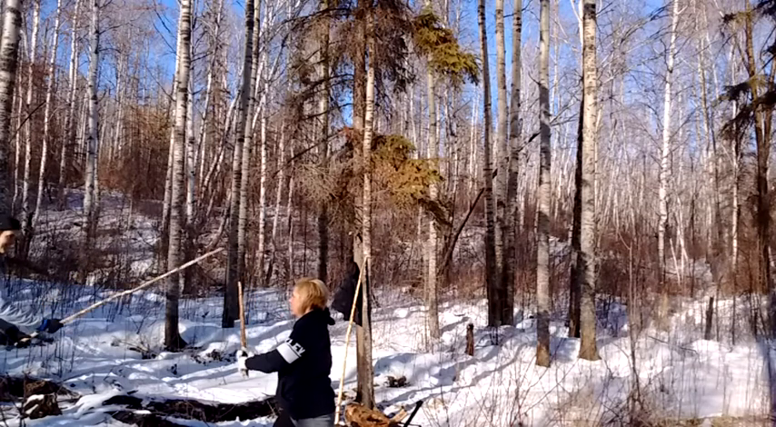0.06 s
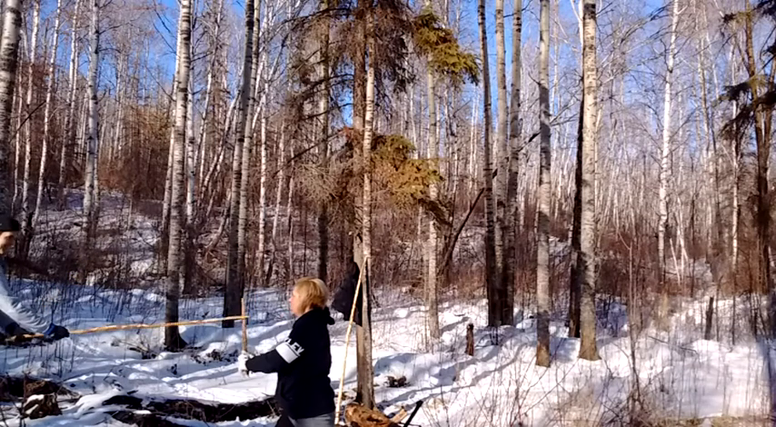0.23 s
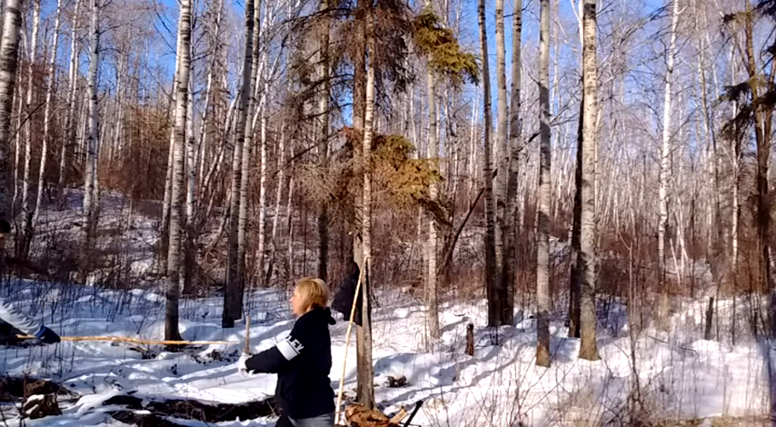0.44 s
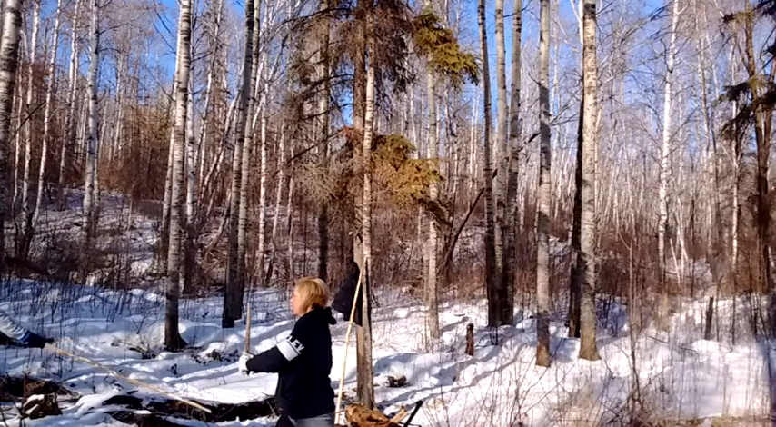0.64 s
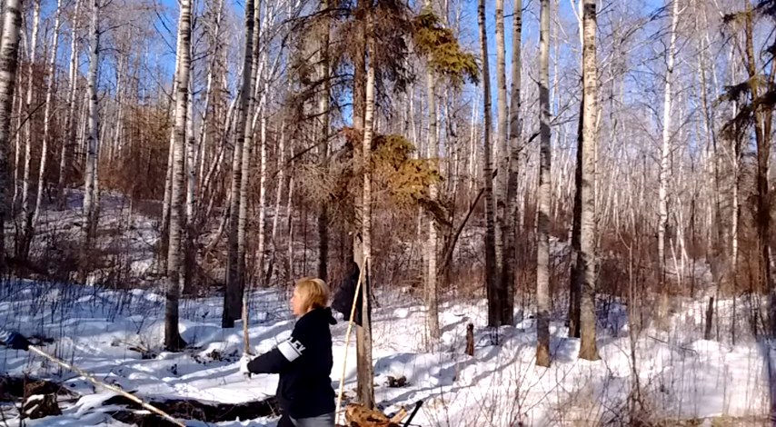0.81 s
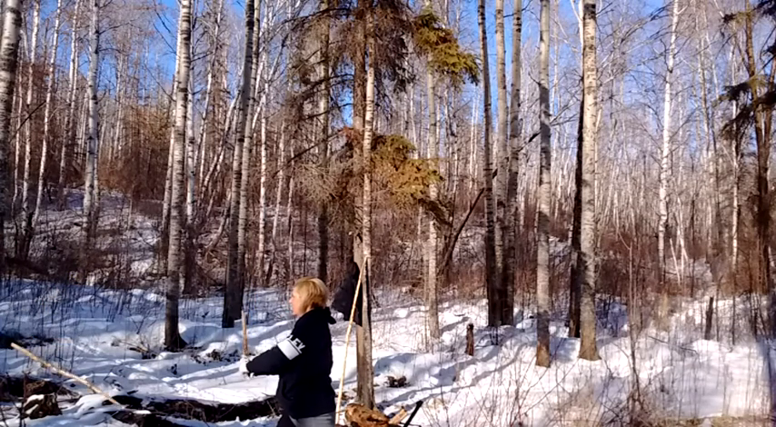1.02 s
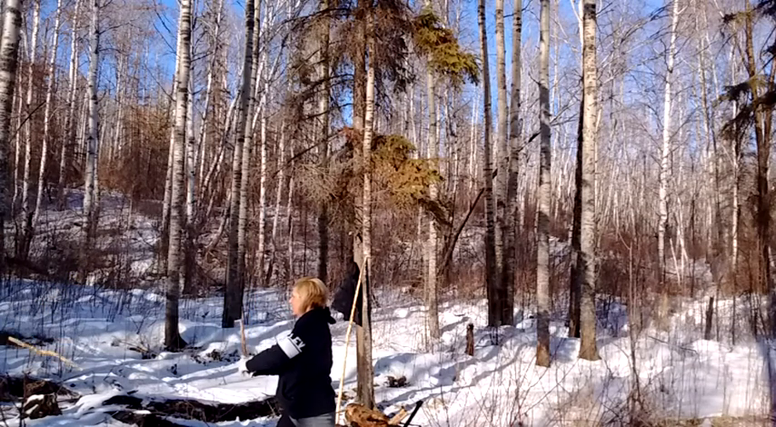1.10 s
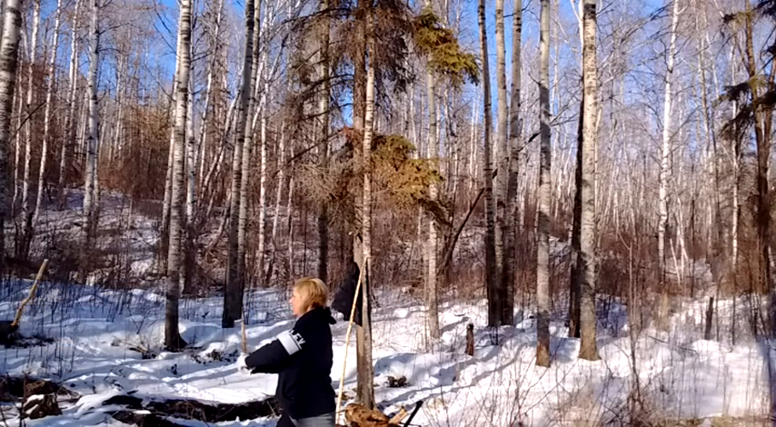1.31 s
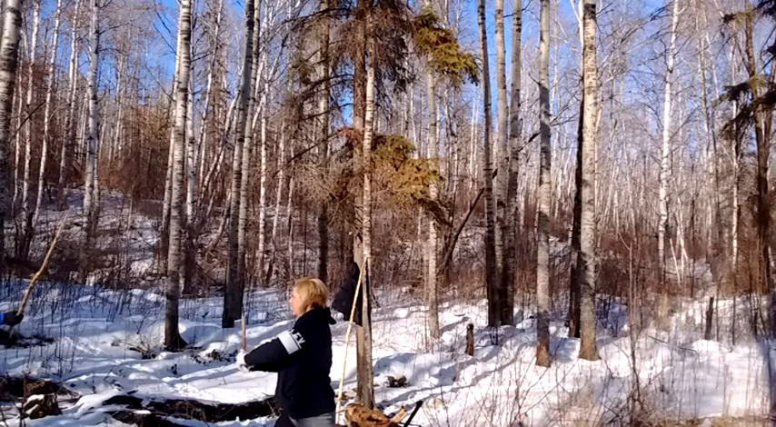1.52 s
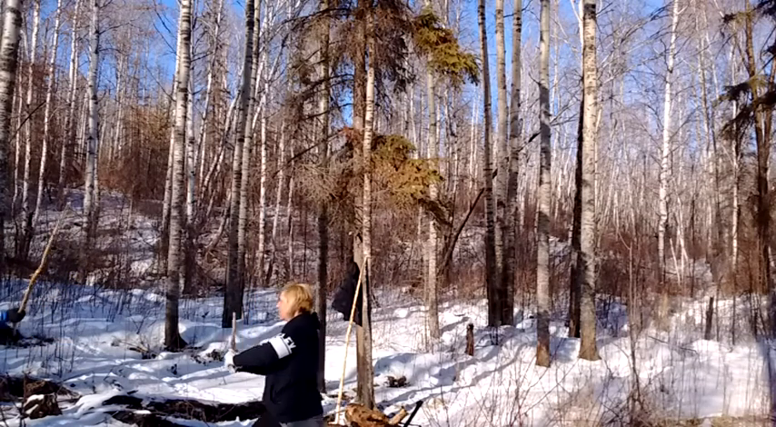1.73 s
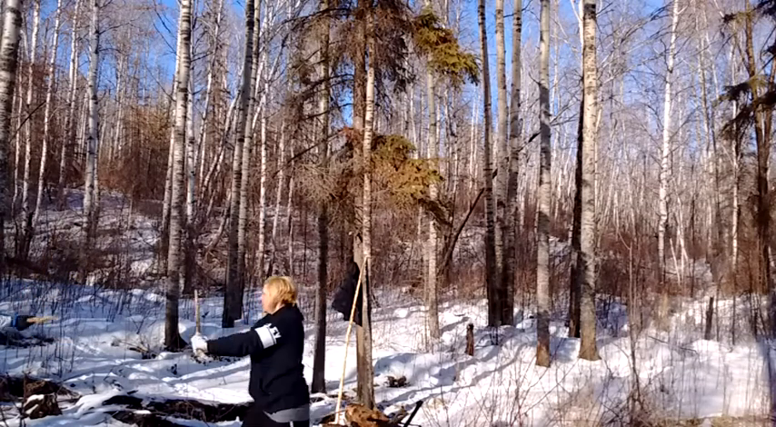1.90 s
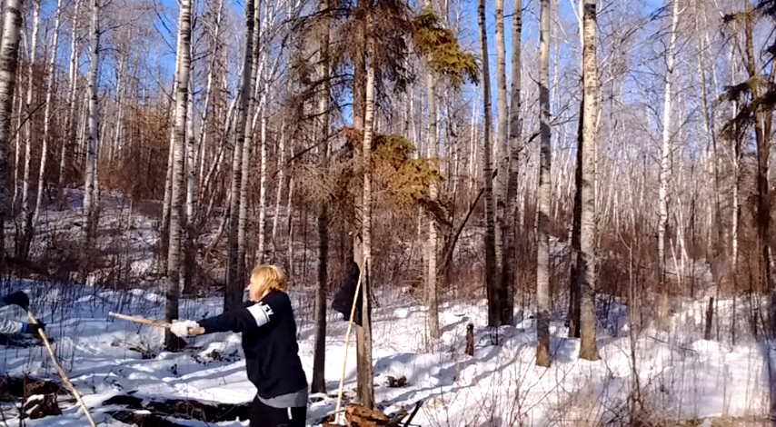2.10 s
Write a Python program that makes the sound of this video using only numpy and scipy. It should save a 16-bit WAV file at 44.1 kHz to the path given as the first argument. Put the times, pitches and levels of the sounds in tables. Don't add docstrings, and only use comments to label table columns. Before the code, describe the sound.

One sharp stick-on-stick clack outdoors among trees, its echo returning quickly; the background dips, then creeps back as quiet hum and air hiss, with small icy clicks and clothing rustles near the end, heard through a compact recorder.

```python
import sys
import numpy as np
from scipy import signal
from scipy.fft import rfft, irfft
from scipy.io import wavfile
from scipy.ndimage import uniform_filter1d

SR = 44100
rng = np.random.default_rng(int(sys.argv[2]) if len(sys.argv) > 2 else 0)


def log_audio(samples):
    frames = np.atleast_2d(samples).T
    limited = np.clip(frames, -1, 1)
    pcm = np.round(limited * 32767).astype(np.int16)
    wavfile.write(sys.argv[1], SR, pcm)


def how_loud(loudness_db):
    steps = np.asarray(loudness_db, float) / 20
    return 10 ** steps


N = 94815
T, HZ = np.arange(N) / SR, np.fft.rfftfreq(N, 1 / SR)

# (time [s], level [dB], contact duration [ms])
CONTACTS = [
    (.22150, 0, .47),
    (.22242, -6.5, .36),
    (.2226, -50, .08),
]
# (frequency [Hz], level [dB], decay time T60 [s], left-right [dB])
STICK_MODES = [(650, -27, 0.026, 9), (950, -14.5, 0.075, 7), (1170, -31, 0.035, 1), (1400, -23, 0.011, -5),
               (1907, -11.5, 0.035, 18), (1930, -12.5, 0.012, -22.5), (2410, -16, 0.0051, 13),
               (3275, -8.5, 0.017, -5), (3770, -25, 0.014, 23), (5100, -39, .008, 4),
               (7800, -13, 0.008, -9), (8130, -18, 0.017, 6), (9960, -16, 0.0052, 8),
               (12400, -19, 0.0094, -10)]
RIGHT_LATE_MS = 0.1
SNAP_LOW_HZ, SNAP_DB, RING_DB, BLOW_DB = 900, 0, -8, -1.9

# (frequency [Hz], density [dB per Hz])
NEAR_COLOUR = [(400, -39), (900, 1), (2000, -12), (3500, -14), (5000, -17.5), (8000, -28.5), (15000, -48)]
# (frequency [Hz], density [dB per Hz])
FAR_COLOUR = [(600, -5.5), (1000, 0), (2200, 2), (3000, -2.5), (4700, -7), (5800, -11.5), (8500, -13.5),
              (11000, -28)]
NEAR_DB, NEAR_T60_S = -26, 0.056
FAR_DB, FAR_T60_S, FAR_RISE_S = -35, 0.71, 0.017
PATCHY_DB, PATCHES_PER_S = 2.0, 300
# (arrival time [s], level [dB], centre frequency [Hz], left-right [dB])
ECHOES = [
    (0.358, -20, 1700, 1),
    (0.3565, -41, 750, 2),
    (.3565, -1, 5970, 3),
    (.3566, -14, 8500, -4),
    (0.357, -25, 13000, 0),
    (.3820, -24, 3020, 8),
]
ECHO_SMEAR_DB, ECHO_SMEAR_S = -40.5, 0.14
ECHO_EDGE_DB, ECHO_EDGE_S = -37, 0.0063
# (arrival time [s], level [dB], decay time T60 [s], frequency [Hz], left-right [dB])
MODE_ECHOES = [(.2415, -29, .008, 4700, 3), (.2465, -28, .01, 4800, 3), (.2505, -29, .01, 4400, 3),
               (.2475, -28, .01, 2300, 0), (.2540, -30, .016, 950, 3), (.2730, -28, .012, 1900, 2),
               (.2805, -31, .008, 4600, 2), (.2880, -32, .008, 4400, 2), (.2860, -31, .012, 2000, 0),
               (.2955, -31, .012, 2250, 0), (.3572, -20, .008, 4400, 6), (.3574, -23, .006, 5500, 2),
               (.3599, -18, .008, 2450, -3), (.3645, -27, .014, 1900, 2), (.2300, -25, .02, 1500, 2),
               (.3562, -19, .006, 2300, -2), (.3572, -24, .005, 3300, 0), (.3575, -29, .014, 800, 2)]

# (time [s], level [dB], decay time T60 [s], frequency [Hz], left-right [dB])
SPLINTERS = [(1.2336, -38, 0.0088, 5050, 10), (1.2337, -39, .012, 7620, -4), (1.2338, -48, .01, 12700, 2),
             (1.237, -36, 0.011, 8100, -11), (1.2383, -41, 0.011, 10100, -4), (1.2448, -44, 0.01, 3980, 8),
             (1.2610, -56, 0.0086, 8050, -4), (2.0075, -50, .01, 7800, 0), (2.0168, -39.5, 0.009, 4200, 11),
             (2.0172, -42, .01, 7600, -2), (2.0214, -41, 0.011, 8500, -9), (1.2338, -40, .01, 3650, 11),
             (1.7885, -37.5, 0.017, 1850, 3), (2.0349, -29, .012, 8250, -2), (2.0348, -44, .01, 14500, 0),
             (2.0352, -40, .008, 3200, 6), (2.0354, -42, .007, 5600, 4), (2.0386, -38, .014, 8300, -2),
             (2.0668, -42, .008, 14600, 4), (2.0670, -42, 0.014, 8000, -4), (2.0672, -43, .008, 12400, 0),
             (.128, -46, 0.012, 693, -2), (1.826, -36, 0.021, 850, 3)]
# (time [s], level [dB], decay time T60 [s], centre frequency [Hz], left-right [dB])
CRACKS = [(0.13, -62, 0.018, 1520, -8), (0.717, -56, 0.027, 4450, 8), (1.083, -55.5, 0.021, 9100, -3),
          (1.2330, -37, 0.013, 4500, 10.5), (1.2337, -45, 0.014, 9000, -9), (1.2326, -46, 0.0093, 12400, 4),
          (1.2368, -46, .018, 9600, -4), (1.245, -48, .012, 4200, 17), (1.2610, -48, 0.013, 8000, -11),
          (1.755, -52, .03, 5000, 8), (1.788, -42.5, 0.036, 1840, 1), (1.828, -51, 0.031, 1200, -2),
          (2.008, -62, 0.015, 8000, 2), (2.018, -51, 0.03, 9000, -4), (2.0349, -42, 0.018, 10500, 0),
          (2.0350, -46, 0.014, 4800, 6), (2.0663, -48, 0.023, 11000, -5), (2.0664, -48, 0.035, 4000, 8),
          (2.093, -58, 0.029, 7000, 4), (2.1445, -41.5, 0.037, 4800, 0), (2.1455, -59, 0.036, 8200, -1)]
CRACK_Q, CRACK_WIDE_DB, CRACK_THUD_DB, CRACK_TAIL_DB = 2.2, -6.5, -7, -12.5
# (centre time [s], half length [s], level [dB], left-right [dB])
RUSTLES = [(0.084, .12, -66, 18), (1.17, 0.049, -81, 10), (1.266, 0.058, -55.5, 4),
           (1.736, 0.046, -58.5, 3), (1.785, 0.047, -51.5, 2), (1.882, 0.1, -54, 2.5),
           (1.993, 0.019, -60, 6), (2.077, 0.07, -48.5, 1.5)]
# (frequency [Hz], density [dB per Hz])
RUSTLE_COLOUR = [(700, 5), (2000, 10.5), (4500, 4.5), (8000, 2.5), (15500, -4.5)]

# (frequency [Hz], density [dB per Hz])
DRONE_COLOUR = [(15, -66), (25, -52.5), (124, -9.5), (168, -9.5), (193, -3.5), (226, -8), (266, -4.5),
                (800, -17), (3000, -36.5), (3900, -71), (6600, -120)]
# (frequency [Hz], left-right [dB])
DRONE_PAN = [(45, 9), (90, 10.5), (250, 11), (600, 1), (2000, 1.5)]
DRONE_DB, DRONE_APART_DB = -44.5, -3
# (frequency [Hz], waver [Hz], starting level [dB], rise [dB per s])
TONES = [(65.8, 5.9, -71.5, 3), (99.9, 2.07, -67, 6.5), (137.1, 1.99, -59, 2), (160.7, 2.86, -62, 0.5),
         (200.1, 1.98, -54.5, -1), (264.4, 5.98, -59, -1), (298, 6.4, -58.5, 1), (340.2, 14.9, -63, 3.5),
         (450, 2.85, -61.5, 3)]
TONE_SWAY_DB, TONE_LEAD_RAD = 2.5, 0.76
# (frequency [Hz], density [dB per Hz])
RUMBLE_COLOUR = [(15, -11), (30, -5), (70, 9), (110, -25), (300, -65)]
RUMBLE_DB = -62
# (frequency [Hz], density [dB per Hz])
AIR_COLOUR = [(800, -25), (2000, 4.5), (4000, 2), (6000, -2.5), (9000, -2.5), (12000, -7), (16000, -4.5)]
AIR_MID_DB, AIR_SIDE_DB, AIR_SWAY_DB, AIR_SWAYS_PER_S = -59.5, -60, 0.5, 8

# (frequency [Hz], width [Hz], depth [dB])
MID_DIPS = [(3040, 1220, -7.5), (3090, 360, -1), (6510, 1160, -5.5), (6360, 450, -4.5), (5730, 750, -4),
            (13900, 600, -8), (9300, 900, -3)]
# (frequency [Hz], width [Hz], depth [dB])
SIDE_DIPS = [(4800, 660, -10), (8000, 700, -2), (12400, 1200, -1)]
DUCK_DB, DUCK_ATTACK_S, DUCK_HOLD_S, DUCK_RELEASE_S = -13, 0.018, 0.14, 0.43
TOP_HZ, TOP_DB = 15650, -30


def curve(table):
    hz, db = np.array(table, float).T
    return np.interp(np.log(HZ + 1), np.log(hz), db)


def shape(x, gain):
    return irfft(rfft(x) * gain, N)


def noise(table, channels=2):
    x = shape(rng.standard_normal((channels, N)), how_loud(curve(table)))
    return x / x.std()


def band(x, hz, width_hz):
    return signal.lfilter(*signal.iirpeak(min(hz, 0.45 * SR), hz / width_hz, SR), x)


def fade(start, t60):
    return (T >= start) * how_loud(-60 * np.maximum(T - start, 0) / t60)


def pan(db):
    return how_loud(np.array([[0.5], [-0.5]]) * db)


def walk(rate):
    k = int(SR / rate)
    x = np.repeat(rng.standard_normal(N // k + 1), k)
    x = uniform_filter1d(uniform_filter1d(x, k), k)[:N]
    return x / x.std()


def causal(db):
    cepstrum = irfft(db * np.log(10) / 20, N)
    folded = cepstrum * np.where(T < T[N // 2], 2, 0) - cepstrum[0] * (T == 0)
    return np.exp(rfft(folded))


def pings(table):
    out = 0
    for s, db, t60, hz, lr in table:
        onset = np.clip((T - s) / 0.00025, 0, 1)
        out = out + how_loud(db) * pan(lr) * fade(s, t60) * np.sin(2 * np.pi * hz * (T - s)) * onset
    return out


def air():
    level = np.array([[AIR_MID_DB], [AIR_SIDE_DB]]) + AIR_SWAY_DB * walk(AIR_SWAYS_PER_S)
    mid, side = noise(AIR_COLOUR) * how_loud(level)
    return np.array([mid + side, mid - side])


def drone():
    shared = how_loud(DRONE_DB) * noise(DRONE_COLOUR, channels=1)[0] * how_loud(0.26 * walk(25.26))
    for hz, waver, db, rise in TONES:
        phase = 2 * np.pi * (np.cumsum(hz + waver * walk(9)) / SR + rng.random())
        level = how_loud(db + 3.5 + rise * T + TONE_SWAY_DB * walk(13.68))
        shared = shared + level * np.sin(phase + np.array([[TONE_LEAD_RAD], [0]]))
    apart = how_loud(DRONE_DB + DRONE_APART_DB) * noise(DRONE_COLOUR)
    direction = how_loud(np.array([[0.5], [-0.5]]) * curve(DRONE_PAN))
    return shape(shared + apart, direction) + how_loud(RUMBLE_DB) * noise(RUMBLE_COLOUR)


def rustle():
    swell = sum(how_loud(db) * pan(lr) * np.exp(-((T - s) / half) ** 2) for s, half, db, lr in RUSTLES)
    return swell * how_loud(1.6 * walk(400)) * noise(RUSTLE_COLOUR)


def cracks():
    wide, grit, out = noise(RUSTLE_COLOUR), rng.standard_normal((2, N)), 0
    for s, db, t60, hz, lr in CRACKS:
        env = fade(s, t60)
        burst = 3.7 * band(grit * env, hz, hz / CRACK_Q)
        tick = how_loud(CRACK_WIDE_DB) * wide * env
        knock = how_loud(CRACK_THUD_DB) * fade(s, 0.028) * np.sin(2 * np.pi * 1350 * (T - s))
        tail = how_loud(CRACK_TAIL_DB) * wide * fade(s, 5 * t60)
        out = out + how_loud(db) * pan(lr) * (burst + tick + knock + tail)
    return out


def scatter(colour):
    return noise(colour, channels=1) + 1.37 * noise(colour)


def wood(blow):
    s = CONTACTS[1][0]
    near = how_loud(NEAR_DB) * fade(s, NEAR_T60_S)
    build_up = 1 - np.exp(-np.maximum(T - s, 0) / FAR_RISE_S)
    far = how_loud(FAR_DB) * fade(s, FAR_T60_S) * build_up
    patches = how_loud(PATCHY_DB * walk(PATCHES_PER_S))
    out = patches * (near * scatter(NEAR_COLOUR) + far * scatter(FAR_COLOUR))
    smear = how_loud(ECHO_SMEAR_DB) * fade(ECHOES[0][0], ECHO_SMEAR_S)
    edge = how_loud(ECHO_EDGE_DB) * fade(ECHOES[0][0] + 0.00166, ECHO_EDGE_S)
    out = out + (smear + edge) * scatter(RUSTLE_COLOUR)
    for heard, db, hz, lr in ECHOES:
        delay = int((heard - CONTACTS[0][0]) * SR)
        filtered = band(band(blow, hz, hz / 2), hz, hz / 2)
        out = out + how_loud(db) * pan(lr) * np.roll(filtered, delay, axis=1)
    return out


def sticks():
    t = T - np.array([[0], [RIGHT_LATE_MS / 1000]])
    force = sum(how_loud(db) / ms * np.exp(-((t - s) / ms * 2000) ** 2) for s, db, ms in CONTACTS)
    push = -np.gradient(force, axis=1)
    high_pass = signal.butter(1, SNAP_LOW_HZ, "high", fs=SR)
    snap = signal.lfilter(*high_pass, np.gradient(push, axis=1))
    snap = pan(1.2) * snap / np.abs(snap).max()
    ring = 0
    for k, (hz, db, t60, lr) in enumerate(STICK_MODES):
        mode = band(push, hz, np.log(1000) / np.pi / t60)
        ring = ring + (-1) ** k * how_loud(db) * pan(lr) * mode / np.abs(mode).max()
    return how_loud(BLOW_DB) * (how_loud(SNAP_DB) * snap + how_loud(RING_DB) * ring)


def scene():
    blow = sticks()
    echoes = wood(blow) + pings(MODE_ECHOES)
    snow = cracks() + pings(SPLINTERS) + rustle()
    return blow + echoes + snow + drone() + air()


def top_cut(x):
    return signal.sosfilt(signal.butter(12, 16480, fs=SR, output="sos"), x)


def port_dips(table):
    return causal(sum(db * np.exp(-((HZ - hz) / width * 2) ** 2) for hz, width, db in table))


def record(dry):
    mid = shape((dry[0] + dry[1]) / 2, port_dips(MID_DIPS))
    side = shape((dry[0] - dry[1]) / 2, port_dips(SIDE_DIPS))
    since = np.maximum(T - np.abs(mid).argmax() / SR, 0)
    attack = 1 - np.exp(-since / DUCK_ATTACK_S)
    release = np.exp(-np.maximum(since - DUCK_HOLD_S, 0) / DUCK_RELEASE_S)
    ducked = np.array([mid + side, mid - side]) * how_loud(DUCK_DB * attack * release)
    mix = shape(ducked, how_loud(TOP_DB * (HZ > TOP_HZ)))
    return top_cut(mix)


dry = scene()
out = record(dry)
log_audio(out)
```